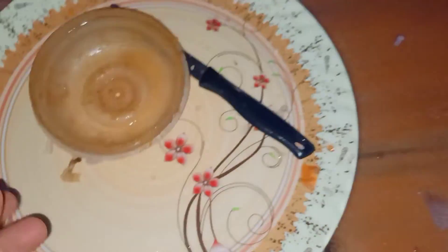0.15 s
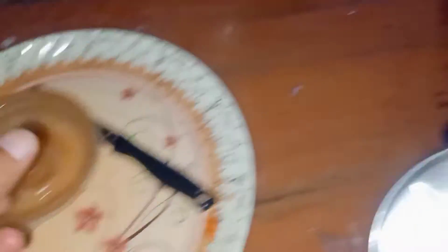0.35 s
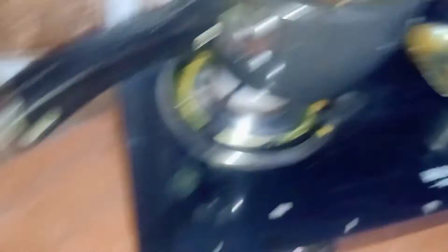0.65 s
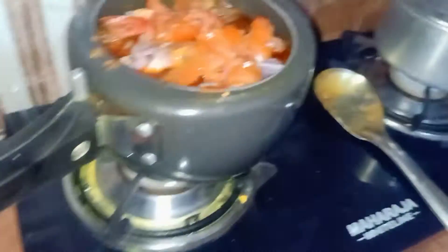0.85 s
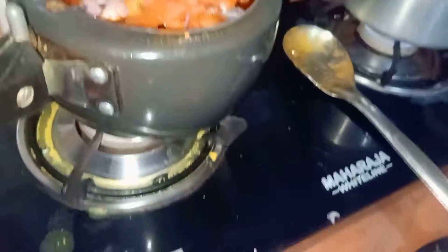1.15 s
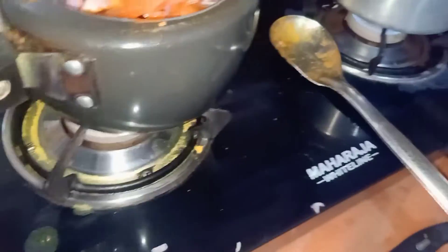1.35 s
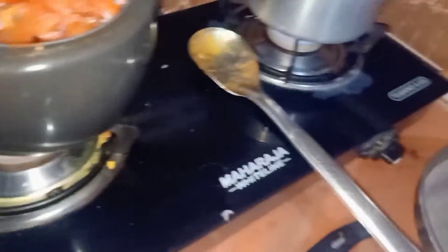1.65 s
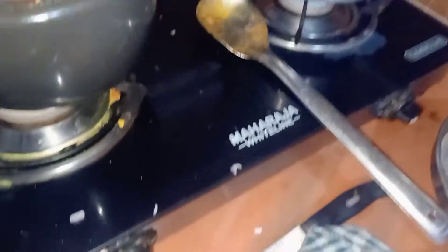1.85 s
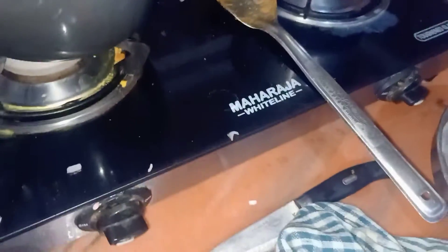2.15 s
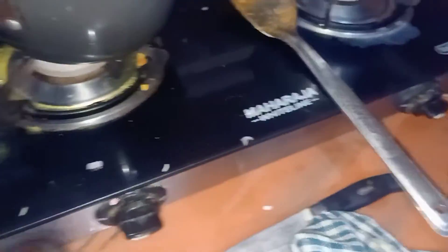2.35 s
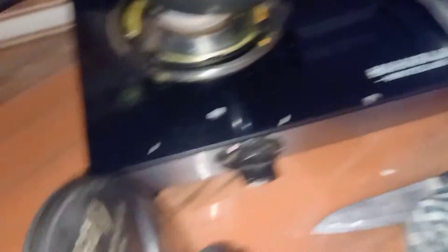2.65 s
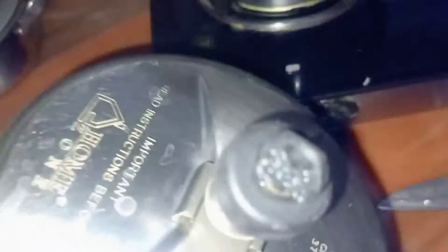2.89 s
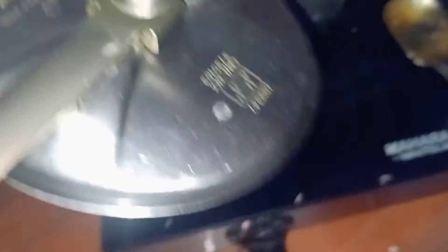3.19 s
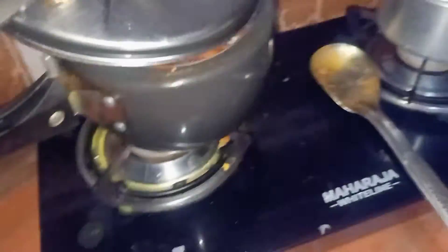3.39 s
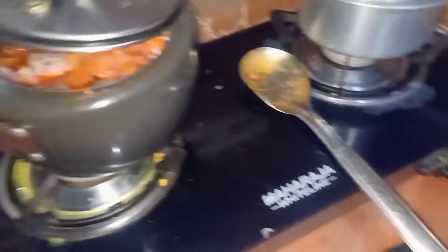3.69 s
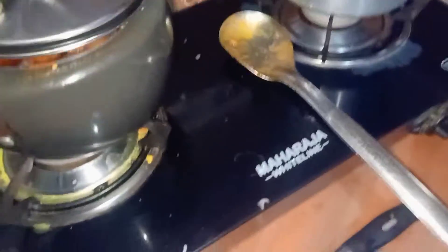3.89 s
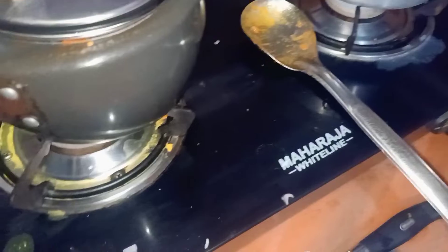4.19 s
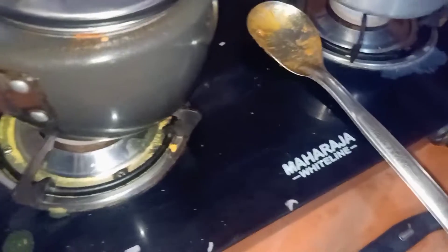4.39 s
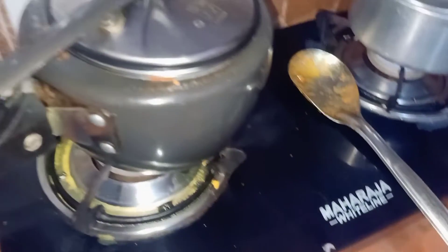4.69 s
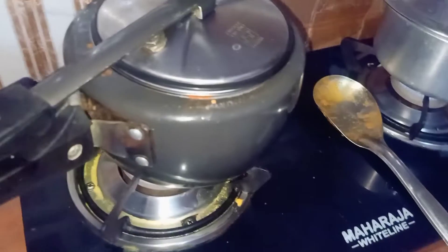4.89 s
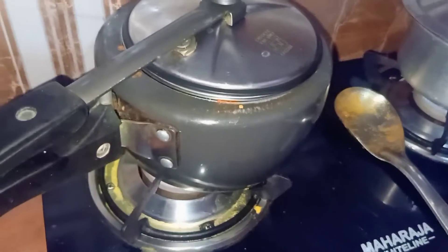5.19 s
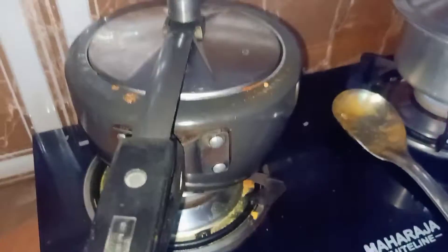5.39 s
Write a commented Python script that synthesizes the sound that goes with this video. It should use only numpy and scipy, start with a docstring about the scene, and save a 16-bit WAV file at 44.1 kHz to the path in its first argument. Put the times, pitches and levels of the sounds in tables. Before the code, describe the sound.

A plate rattles down sharply in the first fifth of a second, then hands and sleeves rustle softly with a thin bangle tinkle. Around two and a half seconds a heavy metal lid scrapes and clinks off the counter, knocks lightly in the hand, then clunks onto a filled pot. Faint touches and a very distant horn follow. Small tiled kitchen, close hand-held phone, one side muffled by a hand.

```python
"""Plate, lid and pot in a tiled kitchen

A plate rattles down, bangles tinkle, a heavy lid is dragged off the counter, clinks in the hand and
drops onto a filled pot, heard by a hand-held phone with two ports, the right one half covered.
Every blow is a short noise crack plus the decaying modes of the struck thing; the drag is dense clicks,
hands and sleeves are grainy noise, bangles and a far horn are sines. Tiled walls smear the close sounds
with a noise tail over a soft coloured hum, and a finger hisses on the right port near the end."""
import sys
import numpy as np
from scipy import signal
from scipy.fft import rfft, irfft
from scipy.io import wavfile
from scipy.ndimage import uniform_filter1d

SR = 44100
rng = np.random.default_rng(int(sys.argv[2]) if len(sys.argv) > 2 else 0)


def int16_out(signal):
    """Quantize to a 16-bit WAV file."""
    q = np.round(np.clip(np.atleast_2d(signal).T, -1, 1) * 32767)
    wavfile.write(sys.argv[1], SR, q.astype(np.int16))


N = 244314
TIME = np.arange(N) / SR  # s

# edges of the four broad bands, bass, middle, treble and top: [Hz]
BAND_HZ = (150, 1200, 3500, 8000, 16000)
# noise spectrum of a hard contact: (frequency [Hz], density [dB per Hz])
CRACK = [(100, -29.5), (330, -9), (500, -11), (720, -9.5), (1400, -16), (2300, -2), (2900, -12),
         (4000, -18.5), (5400, -5.5), (6700, -22), (8000, -32), (10000, -39), (13500, -33), (16000, -36)]
# modes of the lid, struck or dragged: (frequency [Hz], level [dB], t60 before the grip damps it [s])
LID_MODES = [(337.4, -10, 0.064), (449.5, -10.5, 0.095), (626.5, -11, 0.07), (760, -6, .08),
             (974, -5, 0.096), (1240, -19.5, 0.025), (1740, -7, 0.12), (2040, -8, .15), (2322, 3.5, 0.095),
             (2368, -2, 0.17), (2530, -6.5, 0.239), (2880, -16.5, .12), (3200, -19, .12), (3590, -8, 0.12),
             (4170, -20, .15), (4740, -9, .1), (5174, -1.5, 0.044), (5250, -6.5, 0.06), (5566, -5, 0.14),
             (5730, -13, .18), (7150, -26, 0.11)]


def undb(db):
    """Amplitude gain of a dB value."""
    return 10 ** (np.asarray(db) / 20)


def colour(x, points):
    """Causal minimum-phase filter through (Hz, dB) points, from the folded cepstrum of the log gain."""
    hz, db = np.transpose(points)
    grid = np.maximum(np.arange(2049) * SR / 4096, 1)
    log_gain = np.interp(np.log(grid), np.log(hz), db) * np.log(10) / 20
    cepstrum = irfft(log_gain)
    cepstrum[1:2048] *= 2
    cepstrum[2049:] = 0
    response = irfft(np.exp(rfft(cepstrum)))
    return signal.fftconvolve(x, response[None], axes=1)[:, :x.shape[1]]


def band(x, k):
    """One of the four broad bands, 0 bass to 3 top."""
    return signal.sosfilt(signal.butter(4, BAND_HZ[k:k + 2], "band", fs=SR, output="sos"), x)


def pair(size, alike_hz=477.0):
    """Noise for two ports: nearly the same in the bass, unrelated in the treble."""
    mid, side = rng.standard_normal((2, size))
    side = signal.sosfilt(signal.butter(1, alike_hz, "high", fs=SR, output="sos"), side)
    return np.array([mid + side, mid - side]) / np.sqrt(2)


def unit(x):
    """Scale both ports so that the first has an rms of one."""
    return x / np.sqrt(np.mean(x[0] ** 2))


def ringing(modes, alike_hz=900., wobble_db=4., wobble_s=.015, detune=.003):
    """Decaying sines at two ports; loose contact detunes and flutters them, phases part higher up."""
    hz, db, t60 = np.transpose(modes)[:, :, None]
    hz = hz * (1 + detune * rng.standard_normal(hz.shape))
    t = TIME[:SR // 3]
    held = int(wobble_s * SR)
    flutter = uniform_filter1d(rng.standard_normal((len(hz), len(t))), size=held) * np.sqrt(held)
    wobble = wobble_db * flutter * np.minimum(t / wobble_s, 1)
    fade = undb(db - 60 * t / t60 + wobble)
    rise = np.minimum(t / .001, 1)
    lag = 2 * np.pi * rng.random(hz.shape) * np.minimum(hz / alike_hz, 1) ** 2
    phase = 2 * np.pi * hz * t + 0.85 * flutter
    return np.array([rise * fade * np.sin(phase + shift) for shift in (0, lag)])


def struck(blows, modes, crack_db, contact_ms, grip_s, right_db=-4, spot_db=2.5, side_db=1.5, count=3):
    """Each blow is a crack fading with the contact, plus modes weighted by the spot and damped by the grip."""
    bodies = [ringing(modes) for _ in range(count)]  # variants taken in turn
    size = bodies[0].shape[2]
    grip = undb(-60 * TIME[:size] / grip_s)
    t_ms = TIME[:2000] * 1000
    contact = np.exp(-t_ms / contact_ms) * np.minimum(t_ms / 0.29, 1)

    hz, mode_db, _ = np.transpose(modes)
    home = np.searchsorted(BAND_HZ, hz) - 1  # the broad band of each mode
    share = 1 / np.sqrt(np.bincount(home, undb(2 * mode_db))[home])  # evens the mode power per band
    chance = rng.standard_normal((len(blows), len(hz) + 1))

    cracks, out = np.zeros((4, 2, N)), np.zeros((2, N))
    for n, (blow, (side, *spot)) in enumerate(zip(blows, chance)):
        s, db, bass_db, treble_db, top_db, ring_db = blow
        i = int(s * SR)
        band_db = db + np.array([bass_db, 0, treble_db, top_db])
        port_db = np.array([0, right_db + side_db * side])
        gain = undb(band_db[:, None] + port_db)
        spot_gain = share * undb(ring_db + spot_db * np.array(spot))
        weights = (gain[home] * spot_gain[:, None]).T
        out[:, i:i + size] += grip * np.einsum("cm,cmt->ct", weights, bodies[n % count])
        cracks[:, :, i:i + len(t_ms)] += gain[:, :, None] * pair(len(t_ms)) * contact

    first, last = int(blows[0][0] * SR), int(blows[-1][0] * SR) + size
    for k in range(4):
        scale = np.std(colour(band(pair(8192), k), CRACK))
        crack = colour(band(cracks[k, :, first:last], k), CRACK)
        out[:, first:last] += undb(crack_db) * crack / scale
    return out


def plate():
    """A plate rattles down: brief contacts on short modes."""
    # blows: (time [s], level [dB]), then bass, treble, top and ring, all relative to it [dB]
    plate_blows = [(.0015, -34, -6, -5, -28, -2), (.016, -33, -8, -8, -29, -2),
                   (.0333, -24, -15, -6, -36, 1), (.0535, -7.5, -20, -4, -29, -11),
                   (.099, -20, -2, -22, -40, -3.5), (.1265, -22.5, -5, -4, -36, -5),
                   (.149, -21, -24, -10, -40, -5), (.1685, -30.5, -22, -14, -42, -1.5),
                   (.343, -47, -1.5, -14, -42, -3.5), (.391, -62, 14, -11, -30, -7),
                   (.4265, -39, -17, -19, -37, 0), (.44, -41, -28, -21, -47, -1),
                   (.4835, -43, -13, -22, -46, -0.5), (1.447, -58, 0.5, 4, -27, -12)]
    # modes: (frequency [Hz], level [dB], t60 before the grip damps it [s])
    plate_modes = [(333.4, -5.5, 0.11), (626, -12, .06), (1054, -1, 0.065), (1298, -7, 0.034),
                   (1600, 1.5, 0.055), (1940, -5, 0.045), (2716, -9, .03), (3300, -16, .03),
                   (4600, -11, 0.022), (5133, -14, 0.026)]
    return struck(plate_blows, plate_modes, crack_db=-3, contact_ms=1.6, grip_s=.2)


def lid():
    """The heavy lid knocks and clinks in the hand, its modes damped by the grip."""
    # blows: (time [s], level [dB]), then bass, treble, top and ring, all relative to it [dB]
    lid_blows = [(2.1663, -49, -11, -10, -26, -1), (2.1917, -41.5, -6.5, 6, -17, -8.5),
                 (2.267, -46, -5, -8, -45, -3), (2.2787, -28.5, -39, -2.5, -41, -5),
                 (2.29, -33.5, -12.5, -7, -35, -5), (2.3576, -32, -10, -3, -28, -1.5),
                 (2.4431, -21, -22, -3, -39, 1), (2.4654, -20, -10, 0, -32, 1),
                 (2.4782, -14.5, -26, 0, -38, 1), (2.4938, -17.5, -26, 1.5, -40, 1),
                 (2.5013, -24, -13, 6, -30, 2.5), (2.5169, -18.5, -20, -1, -37, -5),
                 (2.5295, -31, -18, 9, -36, -1), (2.583, -36, -16, -3, -37, -5.5),
                 (2.608, -43, -23, -21, -42, -5.5), (2.6517, -12, -18, -3.5, -22, -4.5),
                 (2.666, -20.5, 2.5, 1.5, -2, -7), (2.8429, -45.5, -15, -3, -38, -5),
                 (2.945, -39, -24, -5, -41, -6), (2.951, -39, -21, -12, -33, -6),
                 (2.9921, -32, -34, -22, -51, -1.5), (3.0, -33.5, -10, -8, -50, -11),
                 (3.052, -24.5, -18, 1, -16, -11), (3.0749, -37, -10, 7, -12, -8),
                 (3.0792, -25.5, -17, 4, -16.5, -9), (3.0915, -40, -21, -11, -7, -5.5),
                 (3.2037, -49, -22, -5, -35, -4), (3.2234, -49, -26, -4, -27, -5),
                 (3.2527, -32.5, -38, -4, -34, -6.5), (3.2752, -38.5, -24, -3, -16, -6),
                 (3.2976, -42.5, -21.5, 5.5, -36, -7), (3.3617, -45, -22, 0, -14, -6),
                 (3.4595, -41, -37, -4, -16, -9.5), (3.5849, -47, -20, -1, -18, -8)]
    return struck(lid_blows, LID_MODES, crack_db=-4, contact_ms=2.5, grip_s=.24)


def pot():
    """The lid drops onto the filled pot: longer contacts and a looser grip on the modes."""
    # blows: (time [s], level [dB]), then bass, treble, top and ring, all relative to it [dB]
    pot_blows = [(3.7265, -11.5, -10.5, 0, -16, -7.5), (3.7315, -16, -17.5, -18, -26, -9),
                 (3.7405, -9, -13, -6, -20, -9), (3.749, -21, -4, 4.5, -17, -12),
                 (3.7565, -23.5, -4, -6, -30, -1), (3.7635, -28, -1, -11, -32, -6),
                 (3.8975, -18.5, -7, -12, -29, -6), (3.91, -28.5, -0.5, 1, -30.5, -3.5),
                 (4.124, -55.5, -28.5, -11, -41, 1), (4.221, -57.5, -3, 0, -40, -3),
                 (4.243, -51.5, 3, -4, -38, -9.5), (4.278, -46, -6, -12, -43, -9.5),
                 (4.296, -38.5, -1, -3.5, -39.5, -9.5), (4.51, -61, 6.5, -14.5, -37, -3),
                 (4.688, -50.5, -9.5, -4.5, -40.5, -10.5), (4.76, -62, 7, -12, -40.5, -3)]
    # modes: (frequency [Hz], level [dB], t60 before the grip damps it [s])
    pot_modes = [(343.6, -1, 0.19), (440, -4.5, 0.17), (716, -2, .12), (550, -9, 0.14), (895, -13, .12),
                 (1194, -8, 0.083), (1752, -2.5, 0.15), (1948, -9, 0.2), (2130, -5, 0.18),
                 (2170, -4.5, 0.23), (2300, -5, 0.12), (2470, -15, 0.13), (3143, -18, .08),
                 (3700, -10, 0.25), (4190, -13, 0.11), (4890, -5.5, 0.056), (5600, -18, 0.26),
                 (5730, -4, 0.11), (5300, 1, 0.051), (6400, -7.5, 0.049)]
    return struck(pot_blows, pot_modes, crack_db=-1.27, contact_ms=3.5, grip_s=.45)


def drag(per_s=900., scatter_db=4.5, ring_db=-20, rasp_db=-9):
    """The lid's rim sticks and slips: dense uneven clicks that follow the pull ring the lid and rasp."""
    # strength of the pull over the counter: (time [s], level [dB])
    pull_points = [(2.37, -42.5), (2.434, -37.5), (2.443, -22.5), (2.476, -29), (2.51, -24), (2.58, -63.5),
                   (2.64, -30)]
    s, db = np.transpose(pull_points)
    pull = undb(np.interp(TIME, s, db, -150, -150))
    slips = (rng.random(N) < per_s / SR) * rng.choice([-1, 1], N)
    slips = slips * undb(scatter_db * rng.standard_normal(N))
    body = ringing(LID_MODES).sum(axis=1)
    ring = signal.fftconvolve((pull * slips)[None], body, axes=1)[:, :N]
    ring = band(ring, 1) + band(ring, 2) + undb(-3.5) * band(ring, 0)
    rough = uniform_filter1d(np.abs(slips), size=50)
    rasp = unit(colour(pair(N) * rough, CRACK))
    return undb(ring_db) * ring + undb(rasp_db) * pull * rasp


def rustle(grain_per_s=1200.0, scatter_db=3.2, rise_s=0.017):
    """Sleeves and hands rub softly: noise roughened by small grains; strokes swell quickly and fade. The first
    stroke is the grainy tail of the plate settling."""
    # strokes: (time [s], level [dB], time to fade 20 dB [s], bass [relative dB], top [relative dB]); the first
    # is the plate's noisy tail
    rub_strokes = [(.17, -47.5, 0.1447, -5.5, -32), (.34, -64, 0.04, -6, -28),
                   (.425, -60.5, 0.25, 2.5, -38), (.62, -72, 0.7, 0, -10), (1.05, -67, 0.22, 1, -14),
                   (1.27, -73.5, .6, 2.5, -10), (1.529, -52, 0.21, -8.5, -22),
                   (1.58, -57.5, 0.17, -5.5, -18), (1.79, -67, .5, -2, -17), (1.86, -67, .4, -6, -17),
                   (2.13, -67.5, 0.7, -12, -19), (3.37, -63, 0.1, -15, -28), (3.43, -61.5, .3, 0, -24),
                   (3.58, -61.5, 0.23, -5, -28), (4.215, -60, 0.16, -4.5, -40), (4.274, -59, .12, 8.5, -36),
                   (4.5, -70.5, 0.1, 14, -40), (4.675, -69, .3, 0, -30), (4.75, -74, 0.05, 13.5, -39)]
    grains = (rng.random(N) < grain_per_s / SR) * undb(scatter_db * rng.standard_normal(N))
    roughness = .5 + uniform_filter1d(grains, size=60) * 20
    skin = colour(pair(N) * roughness, CRACK)
    s, db, fade_s, bass_db, top_db = np.transpose(rub_strokes)[:, :, None]
    t = np.maximum(TIME - s, 0)
    strokes = np.minimum(t / rise_s, 1) * undb(db - 20 * t / fade_s)
    middle = strokes.sum(axis=0) * unit(band(skin, 1) + undb(-4) * band(skin, 2))
    bass = (undb(bass_db) * strokes).sum(axis=0) * unit(band(skin, 0))
    top = (undb(top_db) * strokes).sum(axis=0) * unit(band(skin, 3))
    return middle + bass + top


def bangles():
    """Thin glassy partials that rise within 8 ms, beat in level and fade."""
    # partials: (time [s], frequency [Hz], level [dB], t60 [s])
    tinkles = [(.662, 5808, -61, .3), (.662, 4800, -74, .15), (.635, 9700, -75, .25),
               (.65, 11700, -77, .25), (.655, 14000, -73, .25), (1.268, 11950, -70, .3),
               (1.85, 14000, -84, .2), (1.8, 10500, -84, .3)]
    out = np.zeros(N)
    for s, hz, db, t60 in tinkles:
        t = np.maximum(TIME - s, 0)
        beat = 1 + .5 * np.cos(2 * np.pi * rng.uniform(20, 40) * t)
        fade = undb(db - 60 * t / t60) * np.minimum(t / 0.0077, 1)
        out += fade * beat * np.sin(2 * np.pi * hz * t)
    return out


def finger(start_s=5.43, level_db=-55.5):
    """A finger shifts over the right port: steady skin hiss that only this port hears."""
    # skin hiss: (frequency [Hz], density [dB per Hz])
    skin_spectrum = [(300, -10), (1000, -5), (2300, 5.5), (3500, -6.5), (5500, -8.5), (7500, -24),
                     (16000, -40)]
    hiss = unit(colour(rng.standard_normal((1, N)), skin_spectrum))[0]
    on = np.clip((TIME - start_s) / 0.0083, 0, 1)
    return np.array([[0], [1]]) * undb(level_db) * hiss * on


def horn(start_s=5.04, end_s=5.42):
    """A far-off horn: a few weak sine partials that waver in level."""
    # partials: (frequency [Hz], level [dB])
    horn_partials = [(1587, -72), (2110, -81), (2640, -81)]
    on = uniform_filter1d(1. * ((TIME > start_s) & (TIME < end_s)), size=900)
    waver = uniform_filter1d(rng.standard_normal((len(horn_partials), N)), size=1200) * np.sqrt(1200)
    tones = [undb(db + 2 * w) * np.sin(2 * np.pi * hz * TIME)
             for (hz, db), w in zip(horn_partials, waver)]
    return on * sum(tones)


def hum(level_db=-62.5, early_top_db=4):
    """Distant street and appliances: coloured noise with a slowly swelling bass and extra early hiss."""
    # steady spectrum: (frequency [Hz], density [dB per Hz])
    hum_spectrum = [(25, -29), (70, -22.5), (103, 1), (125, -5), (145, -4), (210, -7), (400, -13.5),
                    (900, -17), (1400, -24), (2400, -21), (3300, -35), (5500, -30), (7200, -47.5),
                    (16000, -60)]
    air = unit(colour(pair(N, 900.), hum_spectrum))
    low = signal.sosfilt(signal.butter(2, 400, fs=SR, output="sos"), air)
    swell = uniform_filter1d(rng.standard_normal(N), size=5000) * np.sqrt(5000)
    early_bass_db = np.interp(TIME, [2.3, 4.4], [2.5, 0])
    bass_change = undb(1.5 * swell + early_bass_db) - 1
    early_top = np.interp(TIME, [2.1, 2.6], [undb(early_top_db), 0])  # gain of the added top band
    return undb(level_db) * (air + low * bass_change + early_top * band(air, 3))


def walls(x):
    """Tiled walls: a decaying noise tail for each port, built octave by octave, rising over 4 ms."""
    # reverberation: (frequency [Hz], t60 [s])
    wall_t60 = [(150, 0.531), (600, 0.41), (2000, 0.3), (5000, .3), (12000, 0.32)]
    wall_hz, wall_s = np.transpose(wall_t60)
    t, tail = TIME[:SR // 2], 0
    for hz in 125 * 2. ** np.arange(7):
        t60 = np.interp(np.log(hz), np.log(wall_hz), wall_s)
        octave = signal.butter(2, [hz, min(2 * hz, .45 * SR)], "band", fs=SR, output="sos")
        tail = tail + signal.sosfilt(octave, pair(len(t))) * undb(-60 * t / t60)
    tail = tail * np.minimum(t / .004, 1)
    return signal.fftconvolve(x, tail / np.sqrt(np.sum(tail[0] ** 2)), axes=1)[:, :N]


def cover(x, losses, left_lag=16):
    """The right port hears through a hand; the left hears a few samples later."""
    left = np.roll(x[:1], left_lag)
    right = colour(x[1:], [(hz, -db) for hz, db in losses])
    return np.vstack([left, right])


def scene():
    """Close contacts with their room, then the background."""
    # what the hand takes from close sounds: (frequency [Hz], loss [dB])
    near_loss = [(60, -1), (200, -3), (700, 1.5), (1300, 3.5), (2400, 7), (3500, 13), (5500, 29),
                 (8000, 12.5), (12000, 6.5), (15000, 22)]
    # what the hand takes from the hum: (frequency [Hz], loss [dB])
    far_loss = [(60, 0), (200, -0.5), (700, 2), (1300, 3.5), (2400, 4), (3500, 8.5), (5500, 18.5),
                (8000, 5.5), (12000, 2), (15000, 7)]
    near = plate() + lid() + pot() + drag() + rustle() + bangles()
    # close sounds carry no deep bass below about 100 Hz
    near = signal.sosfilt(signal.butter(2, 100, "high", fs=SR, output="sos"), near)
    room = near + undb(-6.5) * walls(near)
    close = undb(2.7) * cover(room, near_loss)
    far = undb(3.5) * cover(hum(), far_loss)
    return close + far + horn() + finger()


def record(dry):
    """The phone drops the rumble, rounds the loudest peaks and cuts the top."""
    wet = signal.sosfilt(signal.butter(1, 20, "high", fs=SR, output="sos"), dry)
    rounded = .9 * np.tanh(wet / .9)
    return signal.sosfilt(signal.ellip(8, .2, 70, 15600, fs=SR, output="sos"), rounded)


dry = scene()
out = record(dry)
int16_out(out)
```